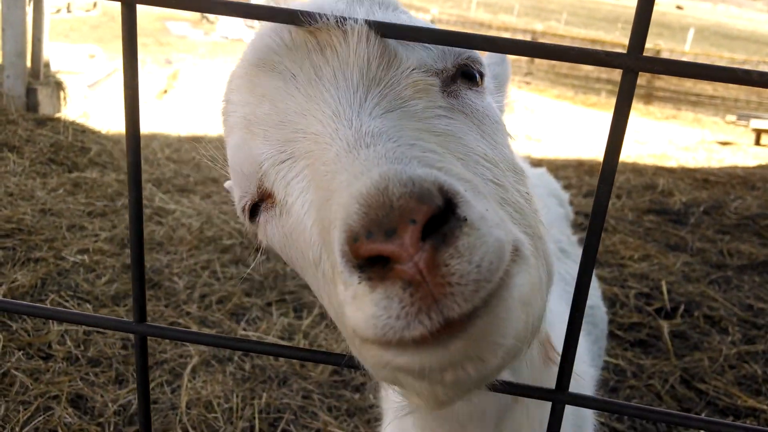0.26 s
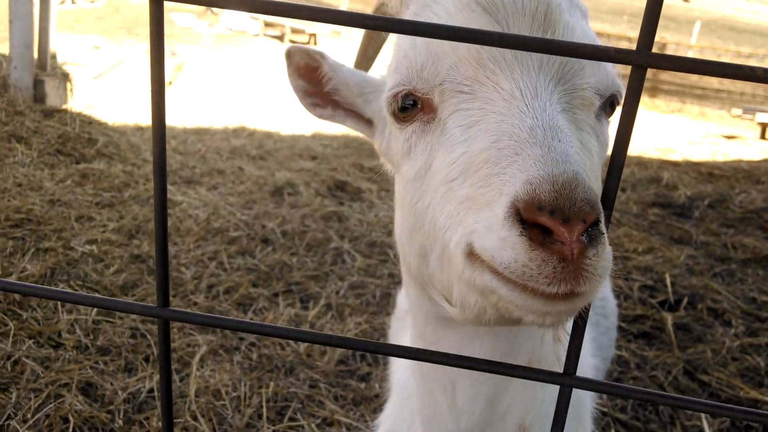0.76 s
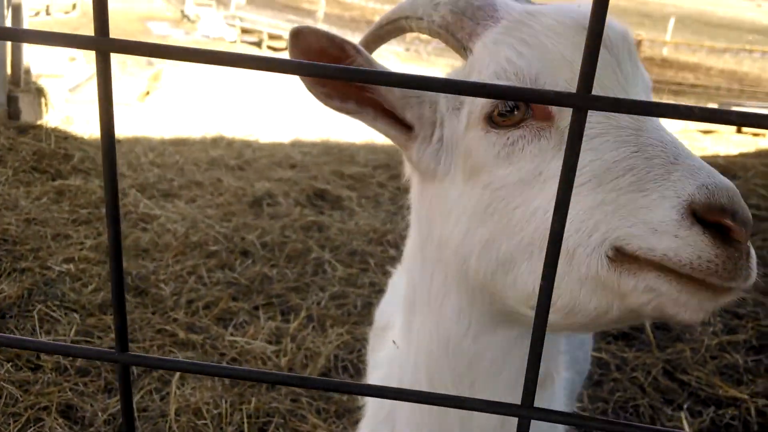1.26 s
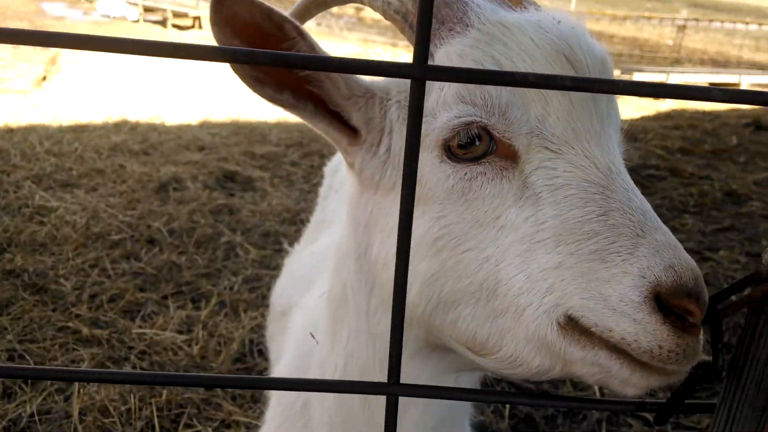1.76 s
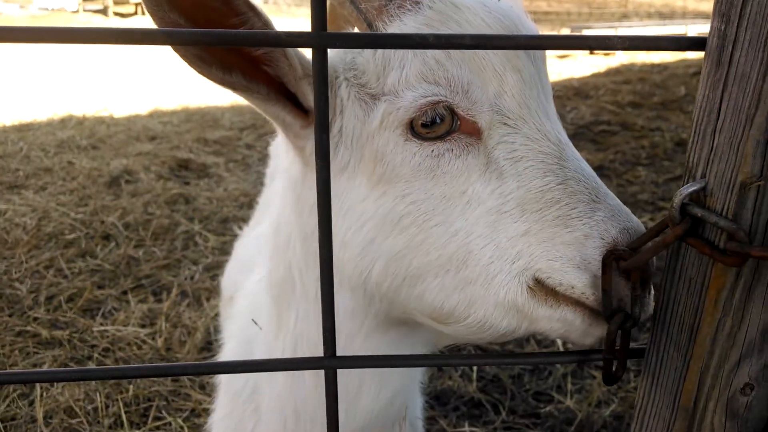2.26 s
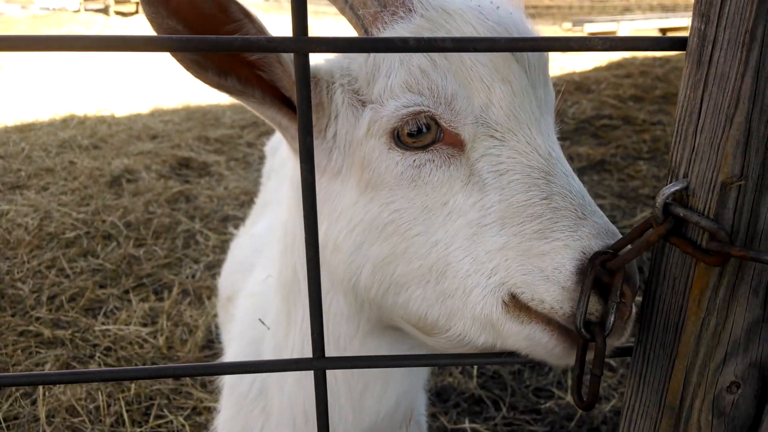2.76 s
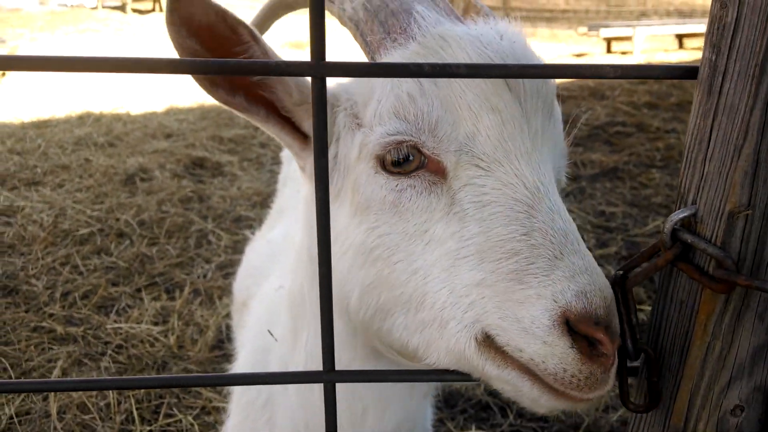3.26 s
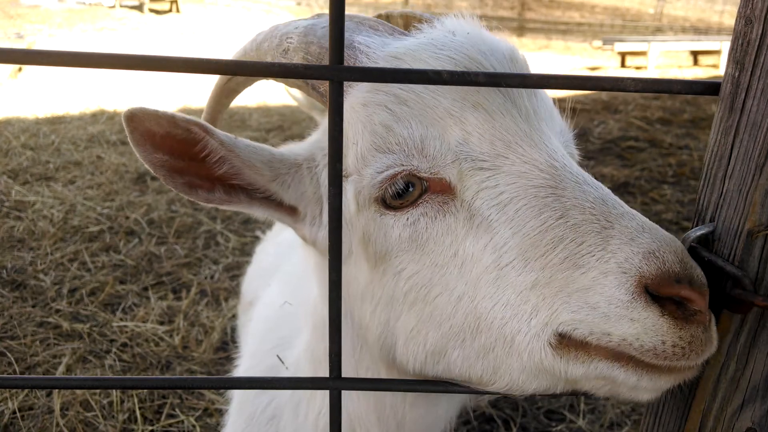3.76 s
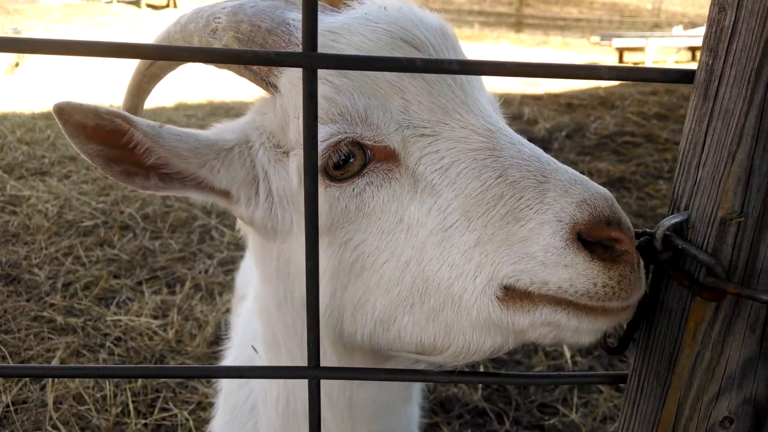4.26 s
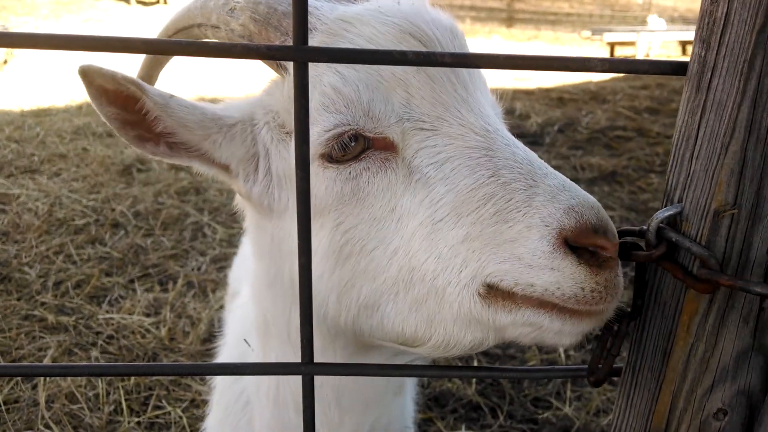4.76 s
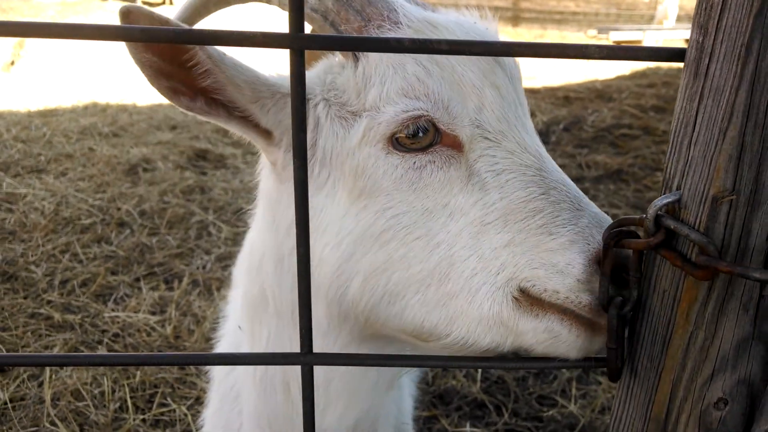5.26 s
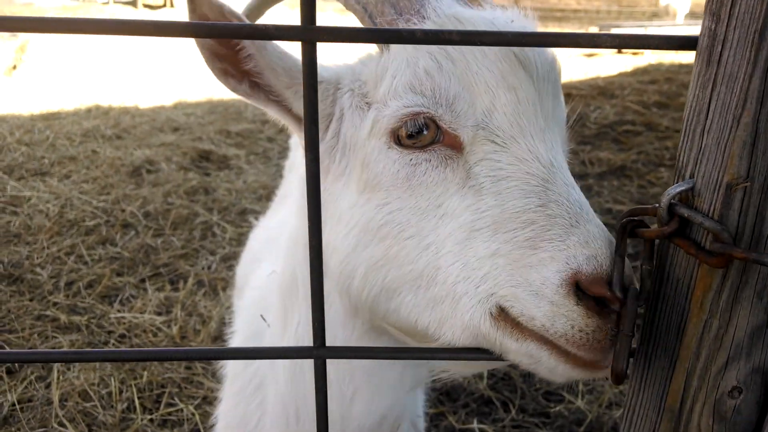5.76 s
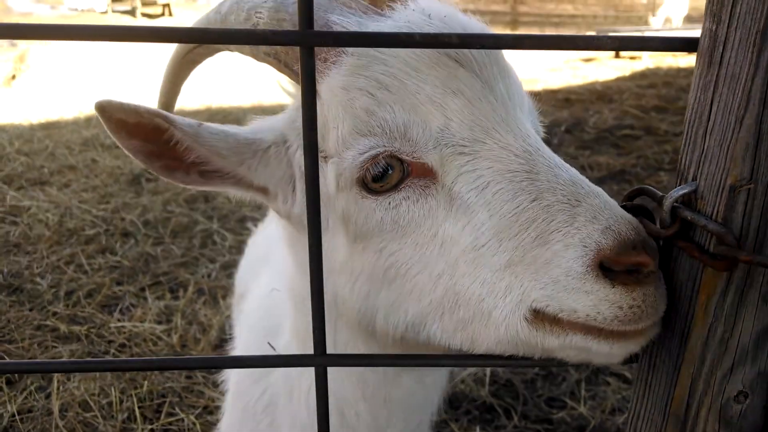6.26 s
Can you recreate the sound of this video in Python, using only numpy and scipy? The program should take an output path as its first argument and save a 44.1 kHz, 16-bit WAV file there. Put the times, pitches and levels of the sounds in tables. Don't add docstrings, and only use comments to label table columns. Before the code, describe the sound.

Close by a fence, a muzzle sniffs and scrapes at a rattling chain on hollow wood, with one quavering bleat under buffeting wind.

```python
import sys
import numpy as np
from scipy import signal
from scipy.fft import rfft, irfft
from scipy.io import wavfile
from scipy.ndimage import uniform_filter1d

SR = 44100
rng = np.random.default_rng(int(sys.argv[2]) if len(sys.argv) > 2 else 0)


def wrap_up_sound(samples):
    columns = np.atleast_2d(samples).T
    tamed = np.clip(columns, -1, 1)
    steps = np.round(tamed * 32767).astype(np.int16)
    wavfile.write(sys.argv[1], SR, steps)


def makeup_ratio(level_db):
    decades = np.asarray(level_db, float) / 20
    return 10 ** decades


N = 286650

# pitch in Hz, level in dB per Hz.
PADDOCK_SPECTRUM = [(60, 2), (200, 1.5), (500, -1.5), (1000, -18), (2000, -19.5), (4000, -24), (8000, -25),
                    (16000, -20)]
# time in seconds, level in dB.
BIRD_CHIPS = [(1.649, -26), (1.805, -25), (1.87, -30)]

# pitch in Hz, level in dB per Hz.
WIND_SPECTRUM = [(12, 2.5), (20, -5), (59, 1.5), (143, -6), (401, -23), (536, -40), (619, -41.5),
                 (742, -48), (812, -50), (1500, -51), (1950, -104), (3300, -120)]
# time in seconds, level in dB.
BREEZE_LEVEL = [(0, -39), (1.1, -35.5), (1.25, -51.5), (1.4, -38), (2.3, -46.5), (2.5, -43.5), (2.9, -38),
                (4.6, -50), (4.9, -68), (5.2, -65), (5.4, -53), (6.0, -53.5), (6.5, -57)]
# start in seconds, hold in seconds, rumble in dB, flutter in dB above the rumble.
GUST_TABLE = [(0.0, 0.021, -37, -10.5), (0.091, 0.018, -25.5, -7.5), (0.325, 0.005, -31.5, -20.5),
              (0.447, 0.071, -28.5, -9.5), (0.678, 0.13, -32, -18), (0.816, 0.022, -22.5, -3),
              (0.97, 0.038, -26.5, -7), (1.108, 0.038, -33.5, -8), (1.318, 0.0049, -33.5, -23),
              (1.468, 0.031, -27.5, -12.5), (1.612, 0.0113, -21, -6.5), (1.724, 0.061, -33.5, -6),
              (1.885, 0.031, -30, -7), (2.007, 0.015, -32, -6.5), (2.166, 0.026, -26, -18),
              (2.233, 0.012, -22, 1), (2.491, 0.0048, -25, -3.5), (2.66, 0.012, -34, -9),
              (2.795, 0.055, -32, -14.5), (2.998, 0.014, -34.5, -6), (3.101, 0.13, -33, -11.5),
              (3.327, 0.24, -39.5, -2), (3.713, 0.01, -38.5, -7), (3.857, 0.19, -43.5, -6),
              (4.215, 0.029, -36, -16), (4.439, 0.012, -35, -9), (4.545, 0.034, -36.5, -8.5),
              (5.268, 0.082, -47.5, -5.5), (6.013, 0.18, -45.5, 1.5), (6.3, 0.048, -37.5, -13)]
# time in seconds, peak in dB.
WIND_POPS = [(0.069, -26), (0.316, -25), (0.625, -29), (0.752, -24), (0.831, -18), (0.926, -30),
             (0.979, -18.5), (1.102, -24), (1.147, -28.5), (1.587, -26), (2.207, -24), (2.359, -37.5),
             (2.451, -32.5), (2.672, -34.5)]

# pitch in Hz, level in dB per Hz.
RUB_SPECTRUM = [(300, 12), (700, 8.5), (1500, 0), (2300, -1), (3500, -7.5), (5000, -27), (7000, -36),
                (10000, -65.5)]
# start in seconds, hold in seconds, level in dB.
RUB_BOUTS = [(0.1, 0.044, -50.5), (0.6, 0.17, -56), (2.3, 0.74, -56.5), (2.62, 0.3, -53.5),
             (3.0, 0.1, -49.5), (3.4, 0.064, -43.5), (3.8, 0.074, -49), (4.2, 0.035, -46.5),
             (4.5, 0.14, -45.5), (5.5, 0.37, -62), (6.05, 0.1, -50.5), (6.435, .08, -46)]
# pitch in Hz, level in dB per Hz.
SNIFF_SPECTRUM = [(1500, -72.5), (3000, 7.5), (5300, 6), (7000, 8), (9500, 8), (12000, 7), (14500, 6.5),
                  (16500, -23)]
# start in seconds, hold in seconds, level in dB.
SNIFF_BREATHS = [(0.0, .85, -63.5), (2.9, .4, -55), (3.75, .12, -53), (4.24, .26, -51), (5.7, .7, -61),
                 (6.47, .05, -51)]
# time in seconds, pitch in Hz, level in dB.
NOSTRIL_WHISTLES = [
    [(2.8, 8540, -94.5), (2.92, 11850, -56), (3.03, 13900, -53), (3.1, 13770, -50), (3.17, 14630, -48),
     (3.25, 13470, -51), (3.35, 9900, -56), (3.39, 8400, -103)],
    [(3.7, 5900, -100), (3.745, 5760, -53), (3.78, 5630, -62), (3.8, 5700, -54), (3.83, 5800, -100)],
    [(5.08, 6300, -100), (5.105, 6340, -68), (5.125, 6360, -66), (5.15, 6300, -100)],
    [(1.19, 1600, -100), (1.21, 1630, -61), (1.232, 1770, -60.5), (1.255, 1790, -100)],
]

# time in seconds, peak of the crack in dB, thud in dB,
# pitch of the thud in Hz, metal edge in dB.
HARD_KNOCKS = [(0.1485, -30.5, -32, 1610, -59), (1.708, -40, -34, 1600, -55), (1.805, -30, -36, 1200, -49),
               (1.976, -19, -26, 860, -56.5), (3.4423, -42, -34, 2310, -53.5),
               (3.4650, -32, -34, 1300, -52), (3.488, -24, -31, 1015, -56.5),
               (3.8448, -33, -34.5, 1020, -54.5), (3.8845, -26, -29.5, 990, -44.5),
               (3.91, -42, -33.5, 765, -47.5), (3.943, -18.5, -32.5, 800, -60),
               (4.0518, -40, -35.5, 819, -67), (4.203, -23.5, -30, 1210, -58.5),
               (4.223, -33, -31.5, 1164, -44), (4.6307, -9, -30, 1650, -52), (4.781, -34.5, -34, 1370, -41),
               (4.8148, -9.5, -29, 1060, -45.5), (5.265, -30, -43.5, 1700, -62),
               (5.981, -31.5, -38, 1630, -57), (6.0277, -30, -32, 1050, -38),
               (6.0382, -26, -37, 1400, -40.5), (6.168, -10, -33.5, 1167, -11.5),
               (6.1944, -31, -42.5, 1505, -28), (6.3341, -28.5, -27, 1100, -58.5),
               (6.4053, -17.5, -45, 860, -17), (6.4547, -40, -31.5, 1225, -53)]
# time in seconds, thud in dB, pitch of the thud in Hz.
SOFT_TAPS = [(2.4046, -44, 940), (2.63, -47, 1190), (2.719, -47, 795), (3.3445, -43, 1240),
             (3.3660, -34.5, 994), (3.683, -40, 1220), (3.7905, -36.5, 842), (3.812, -29.5, 1260),
             (3.8636, -32.5, 1540), (4.1342, -39, 1570), (4.4681, -43, 1140), (4.5276, -34.5, 1310),
             (4.6, -33.5, 1470), (4.9306, -43, 821), (4.958, -49, 1630), (4.967, -48, 1610),
             (5.066, -54, 1590), (5.1917, -49.5, 1670), (5.217, -50, 1680), (5.497, -49, 996),
             (5.9979, -38, 1670)]
# pitch in Hz, level in dB, seconds to die away by 60 dB.
LINK_TONES = [
    [(11290, -6, .08), (11385, -15, .14), (11418, -4, .17)],
    [(12125, -12, .14), (12160, -4, .38)],
    [(13160, -4, .08), (13190, 3, .25)],
]
# time in seconds, then first, second and third link in dB.
LINK_BLOWS = [(1.6352, -43, -48, -66), (1.708, -41, -45, -50), (1.75, -46, -55, -65),
              (1.805, -51, -50, -70), (1.9733, -26.5, -36, -50), (2.06, -70, -41, -56),
              (2.14, -70, -42, -80), (3.3144, -46, -65.5, -72), (3.3737, -49.5, -75, -70),
              (3.4682, -20, -59, -40), (3.7993, -43, -61, -68), (3.845, -42, -66, -72),
              (3.886, -39, -63.5, -72), (3.91, -47, -64, -72), (4.6326, -15.5, -32, -40),
              (4.817, -27.5, -44, -46), (5.217, -47, -64, -74.5), (5.9805, -44, -44, -62),
              (6.0404, -23, -39, -48), (6.195, -36, -52, -68), (6.3604, -38, -66, -70),
              (6.407, -38, -56.5, -60), (6.4551, -31, -51.5, -64)]
# pitch in Hz, level in dB, seconds to die away by 60 dB.
WIRE_TONES = [
    [(2964, -3, 0.023), (3250, -4.5, 0.033), (3270, -30, 0.48)],
    [(4204, -3, 0.019), (4480, -4.5, 0.014), (4800, -19, 0.014)],
]
# time in seconds, low note in dB, high note in dB.
WIRE_TICKS = [(3.343, -35, -37), (3.366, -33, -32), (3.375, -31, -30), (3.389, -38, -37), (3.443, -27, -45),
              (3.452, -42, -43), (3.471, -19.5, -18), (3.488, -21, -16.5), (3.523, -33, -40),
              (3.557, -44, -44), (3.682, -50, -38), (3.792, -38, -40), (3.815, -36, -33), (3.845, -31, -25),
              (3.858, -31, -27), (3.886, -30, -21), (3.892, -24, -18), (3.944, -26, -12),
              (4.052, -42, -32.5), (4.133, -46, -48), (4.205, -38, -19), (4.213, -42, -23),
              (4.287, -48, -40), (4.528, -24, -34), (4.583, -44, -38), (4.601, -34, -44), (4.631, -30, -28),
              (4.8146, -22, -18.5), (4.930, -48, -47), (5.191, -52, -53), (5.217, -46, -54),
              (5.981, -31, -30), (6.000, -34, -42), (6.028, -42, -32), (6.040, -41, -24), (6.168, -40, -30),
              (6.335, -21, -22.5), (6.405, -25.5, -21.5), (6.453, -33, -31.5)]
# pitch in Hz, level in dB, seconds to die away by 60 dB.
POST_TONES = [
    [(1623, -8, 0.039), (1810, -3, 0.034), (1935, -7, 0.03), (1100, -12, 0.04)],
]
# time in seconds, level in dB.
POST_BLOWS = [(0.149, -46), (3.443, -30), (4.052, -37), (4.43, -40), (4.47, -46), (4.530, -39),
              (4.602, -46), (4.632, -36.5), (4.783, -33.5), (4.8147, -23.5), (4.931, -48), (4.960, -43),
              (5.066, -44), (5.192, -52), (5.218, -50), (5.266, -44), (6.030, -33), (6.167, -33),
              (6.335, -22.5)]

# start in seconds, length in seconds, peak in dB,
# highest pitch of the second partial in Hz, upper partials in dB against it.
BLEAT_THROBS = [
    (1.308, 0.058, -34.5, 891, -9.5),
    (1.4, 0.075, -23.5, 901.6, -14),
    (1.502, 0.075, -22, 927, -14.5),
    (1.603, 0.079, -24, 929.5, -14),
    (1.7, 0.084, -23, 928.5, -13.5),
    (1.804, 0.081, -23.5, 928, -14),
    (1.909, .082, -23, 925, -14.5),
    (2.008, 0.082, -21.5, 933.5, -15.5),
    (2.109, 0.083, -21.5, 923, -14.5),
    (2.212, 0.067, -31, 746, -17.5),
]
# pitch in Hz, level in dB.
THROAT_COLOUR = [(1200, -33), (1800, -16), (2050, -20), (2280, -1), (2520, -8), (2780, -2), (3250, 0),
                 (3650, 2), (4050, -13), (4600, -10), (5200, -16), (6600, -11), (7400, -14), (7900, -21),
                 (10300, -21), (11300, -38), (14000, -44)]
# seconds after the start, Hz under the top.
PITCH_CLIMB = [(.006, 220), (.018, 135), (.029, 50), (.042, 8)]
# seconds before the end, Hz under the top.
PITCH_DROP = [(.008, 180), (.02, 53.5), (.03, 0)]

# pitch in Hz, level in dB.
BODY_SHADE = [(500, 0.5), (900, -1), (1400, 2), (2500, -0.5), (4000, -3.5), (6500, 3.5), (9000, -5),
              (14000, 1)]
# pitch in Hz, level in dB.
CROSS_SHARE = [(100, -3), (1000, -4), (2670, -6), (4000, -14.5), (5350, -9.5), (7000, -7), (10000, -16),
               (16000, -7)]


def rms_one(x):
    return x / np.sqrt(np.mean(x ** 2) + 1e-20)


def noise():
    return rng.standard_normal(N)


def in_time(rows):
    s, *columns = np.transpose(rows)
    return [np.interp(np.arange(N) / SR, s, column) for column in columns]


def drift(rate_hz):
    r = np.exp(-2 * np.pi * rate_hz / SR)
    wander = signal.lfilter([1], [1, -2 * r, r * r], rng.standard_normal(N + SR))
    return rms_one(wander[SR:])


def coloured(x, spectrum):
    hz, db = np.transpose(spectrum)
    grid = np.log(np.fft.rfftfreq(N, 1 / SR) + 1)
    gain = makeup_ratio(np.interp(grid, np.log(hz), db))
    return rms_one(irfft(rfft(x) * gain, N))


def band(x, low_hz, high_hz):
    return signal.sosfilt(signal.butter(2, [low_hz, high_hz], "band", fs=SR, output="sos"), x)


def ring(clicks, hz, t60):
    r, w = makeup_ratio(-60 / (t60 * SR)), 2 * np.pi * hz / SR
    return signal.lfilter([0, np.sin(w)], [1, -2 * r * np.cos(w), r * r], clicks + 1e-18)


def struck(bodies, rows):
    out, at = np.zeros(N), [round(row[0] * SR) for row in rows]
    for body, tones in enumerate(bodies):
        blow_db = np.array(rows)[:, body + 1]
        for hz, tone_db, t60 in tones:
            clicks = np.zeros(N)
            clicks[at] = makeup_ratio(blow_db + tone_db + rng.normal(0, 2, len(at)))
            out += ring(clicks, hz, t60)
    return out


def late(x, delay_s, spectrum=((1, 0), (2, 0))):
    hz, db = np.transpose(spectrum)
    grid = np.fft.rfftfreq(N, 1 / SR)
    gain = makeup_ratio(np.interp(np.log(grid + 1), np.log(hz), db))
    return irfft(rfft(x) * gain * np.exp(-2j * np.pi * grid * delay_s), N)


def from_right(x, lag_s, shade_db, bounce_db):
    left = late(x, lag_s, BODY_SHADE)
    scatter = rng.standard_normal(900) * np.exp(-np.arange(900) / SR / 0.0061)
    scatter = scatter / np.linalg.norm(scatter)
    bounces = np.roll(left, round(0.001625 * SR))
    bounces = bounces + 2.5 * signal.oaconvolve(band(left, 780, 14300), scatter)[:N]
    return np.array([makeup_ratio(shade_db) * (left + makeup_ratio(bounce_db) * bounces), x])


def bouts(rows, rise_db_per_s, fall_db_per_s):
    t = np.arange(0, N, 32) / SR
    s, hold, db = np.array(rows).T[:3, :, None]
    rise = rise_db_per_s * np.maximum(s - t, 0)
    fall = fall_db_per_s * np.maximum(t - s - hold, 0)
    return db - rise - fall


def loudest(levels_db, rest_db):
    return np.maximum(np.repeat(levels_db.max(axis=0), 32)[:N], rest_db)


def paddock():
    return np.array([makeup_ratio(-53.5) * coloured(noise(), PADDOCK_SPECTRUM) for port in range(2)])


def bird():
    t, out = np.arange(N) / SR, np.zeros(N)
    for s, db in BIRD_CHIPS:
        puff = np.exp(-((t - s) / 0.0015) ** 2)
        out += makeup_ratio(db) * puff * np.sin(2 * np.pi * 4300 * t + 0.98 * drift(150))
    return out


def gusts():
    breeze_db, = in_time(BREEZE_LEVEL)
    levels_db = bouts(GUST_TABLE, rise_db_per_s=309, fall_db_per_s=303)
    flutter_db = loudest(levels_db + np.array(GUST_TABLE)[:, 3:], breeze_db - 11)
    rumble_db = loudest(levels_db, breeze_db)
    return uniform_filter1d(rumble_db, size=200), uniform_filter1d(flutter_db - rumble_db, size=200)


def wind():
    rumble_db, flutter_db = gusts()
    ports = []
    for share_db in (0, -13):
        eddies = coloured(noise() * makeup_ratio(2.1 * drift(28)), WIND_SPECTRUM)
        rumble = rms_one(band(eddies, 15, 259))
        flutter = rms_one(band(eddies, 184, 1020)) * makeup_ratio(flutter_db - 6.5)
        ports.append(makeup_ratio(rumble_db + 16.5 + share_db) * (rumble + flutter))
    swing = np.arange(-300, 300) / SR / 0.0011
    pop = swing * np.exp(-swing ** 2 / 2)
    for s, db in WIND_POPS:
        start = round((s + 0.00327) * SR) - 300
        ports[0][start:start + len(pop)] += makeup_ratio(db + 22) * pop
    return np.array(ports)


def rubbing():
    level_db = loudest(bouts(RUB_BOUTS, rise_db_per_s=56, fall_db_per_s=39), rest_db=-67.5)
    level_db = level_db + 3.5 + 3.24 * drift(18)
    big_grains = rng.random(N) < 900 / SR
    sizes = makeup_ratio(1.0) + makeup_ratio(4.23 * rng.exponential(1, N)) * big_grains
    shared, left, right = (coloured(noise() * sizes, RUB_SPECTRUM) for draw in range(3))
    shared = rms_one(shared + 0.61 * band(shared, 960, 1250) + 0.96 * band(shared, 1550, 1840))
    return makeup_ratio(level_db) * (from_right(shared, 0.00022, -2.3, -43) + makeup_ratio(-4.5) * np.array([left, right]))


def sniffing():
    level_db = loudest(bouts(SNIFF_BREATHS, rise_db_per_s=68, fall_db_per_s=38), rest_db=-70)
    ports = [makeup_ratio(level_db + 2.5 + 2 * drift(12)) * coloured(noise(), SNIFF_SPECTRUM) for port in range(2)]
    return np.array(ports)


def whistling():
    out = np.zeros(N)
    for hz, db in map(in_time, NOSTRIL_WHISTLES):
        phase = 2 * np.pi * np.cumsum(hz * (1 + 0.012 * drift(80))) / SR
        out += makeup_ratio(db - 4 + 4.5 * drift(30)) * np.sin(phase)
    return from_right(out, 0.000207, -0.35, 2.7)


def knock(crack_db, thud_db, thud_hz, edge_db):
    t = np.arange(SR // 8) / SR
    metal, wood = rng.standard_normal((2, len(t)))
    crack_hz = 4020 * (1 + 0.067 * rng.standard_normal())
    snap = metal * (np.exp(-t / 0.00085) + 0.21 * np.exp(-t / 0.005))
    crack = band(snap, 0.845 * crack_hz, 0.849 * crack_hz) + 2.04 * band(snap, 2180, 7060)
    edge = band(band(metal * np.exp(-t / 0.003), 10300, 13000), 10300, 13000)
    crack += makeup_ratio(edge_db - crack_db + 13) * edge
    crack += 1.14 * band(snap, 5720, 7100)
    rattle = wood * (np.exp(-t / 0.018) + 0.27 * np.exp(-t / 0.036))
    thud = band(rattle, 0.34 * thud_hz, 2.17 * thud_hz)
    thud += 1.5 * band(thud, 0.945 * thud_hz, 1.036 * thud_hz)
    crack = makeup_ratio(crack_db + 7.5) * crack / np.abs(crack).max()
    return crack + makeup_ratio(thud_db + 9.5) * thud / np.abs(thud).max()


def chain():
    out = np.zeros(N + SR)
    taps = [(s, db - 5.5, db, hz, db - 39) for s, db, hz in SOFT_TAPS]
    for s, *strengths in HARD_KNOCKS + taps:
        hit = knock(*strengths)
        out[round(s * SR):][:len(hit)] += hit
    wire = band(struck(WIRE_TONES, WIRE_TICKS), 2600, 4650)
    return out[:N] + struck(LINK_TONES, LINK_BLOWS) + wire


def hollow_post():
    return struck(POST_TONES, POST_BLOWS)


def throb_shape(start, length, peak_db, top_hz, upper_db):
    s = start + np.array([0, 0.017, 0.35 * length, length - 0.019, length])
    below_db = np.array([-13, 1.5, 0, 0, -18])
    return s, top_hz, peak_db + below_db, upper_db - 0.57 * below_db


def throat(closure, phase, puffs, odd_db, breath):
    k = np.arange(3, 19)[:, None]
    shimmer = rng.standard_normal((len(k), len(phase)))
    shimmer_db = uniform_filter1d(shimmer, size=300) * 21 * np.sqrt(k)
    partial_db = odd_db * (k % 2) + shimmer_db - 0.45 * np.maximum(k - 9, 0)
    partials = np.sum(makeup_ratio(partial_db) * np.cos(k * phase + 0.15 * k ** 2), axis=0) / 3
    source = closure * partials + (breath + 0.45 * (1 - closure)) * puffs
    throat_db = np.interp(np.fft.rfftfreq(len(phase), 1 / SR), *np.transpose(THROAT_COLOUR))
    return rms_one(irfft(rfft(source) * makeup_ratio(throat_db), len(phase)))


def throb(t, s, top_hz, db, upper_db, odd_db):
    slack = top_hz < 800
    edge = np.clip(np.minimum(t - t[0], t[-1] - t) / 0.013, 0, 1) ** 2
    climb = np.interp(t - s[0], *np.transpose(PITCH_CLIMB))
    drop = np.interp(s[-1] - t, *np.transpose(PITCH_DROP))
    arch = top_hz - (climb + drop) * (0.45 if slack else 1)
    wobble = signal.lfilter([0.03], [1, -0.97], rng.standard_normal(len(t)))
    phase = np.pi * np.cumsum(uniform_filter1d(arch, size=300) * (1 + 0.045 * wobble)) / SR
    level_db = uniform_filter1d(np.interp(t, s, db), size=200)
    voiced = np.clip(np.minimum((t - s[0] - 0.0098) / 0.018, (s[-1] - 0.0082 - t) / 0.013), 0.06, 1)
    closure = np.clip(1 + (level_db - level_db.max()) / 11, 0, 1)
    closure = closure * np.clip(np.minimum(s[-2] + 0.003 - t, t - s[1] + 0.004) / 0.01, 0.15, 1)
    puffs = rng.standard_normal(len(t)) * (1 + 0.8 * np.cos(phase))
    mouth = throat(closure, phase, puffs, odd_db, breath=0.3)
    clear = makeup_ratio(4) * np.sin(2 * phase) * voiced + makeup_ratio(-18.5) * rms_one(band(puffs, 370, 2670))
    undertone_db = -45 + 16.5 * slack - level_db.max()
    clear += makeup_ratio(undertone_db) * (np.sin(phase) + 0.17 * np.sin(3 * phase)) * voiced
    return edge * makeup_ratio(level_db) * (clear + makeup_ratio(np.interp(t, s, upper_db) + 8) * mouth)


def bleat():
    out = np.zeros(N)
    for row in BLEAT_THROBS:
        s, top_hz, db, upper_db = throb_shape(*row)
        odd_db = -2.5 - 3 * (s[0] - BLEAT_THROBS[0][0])
        at = np.arange(round((s[0] - 0.012) * SR), round((s[-1] + 0.011) * SR))
        out[at] += throb(at / SR, s, top_hz, db, upper_db, odd_db)
    echo = np.roll(band(out, 380, 7200), round(0.026 * SR))
    echo = echo + 0.69 * np.roll(band(out, 730, 2110), round(0.049 * SR))
    bright_echo = np.roll(band(out, 1200, 4600), round(0.037 * SR))
    shed = ring(band(out, 1900, 2180), 2200, 0.16)
    return out + makeup_ratio(-19.5) * echo + makeup_ratio(-22) * bright_echo + makeup_ratio(-48) * shed


def scene():
    near = from_right(bleat(), 0.00022, -11, -1.6)
    near += from_right(chain(), 0.00021, -12, -9.5)
    near += from_right(hollow_post(), 0.0001, -2, -11.5)
    muzzle = rubbing() + sniffing() + whistling()
    return paddock() + bird() + wind() + muzzle + near


def top_cut(x):
    return signal.sosfilt(signal.butter(12, 16790, fs=SR, output="sos"), x)


def record(dry):
    dull_left = late(dry[0], 0, [(5000, 1.5), (8000, -2), (12000, -8.5), (16000, -18)])
    ports = np.array([dull_left, dry[1]])
    out = ports - late(ports[::-1], 0.000374, CROSS_SHARE)
    out = 0.95 * np.tanh(out / 0.95)
    out = signal.sosfilt(signal.cheby2(10, 30, 16500, fs=SR, output="sos"), out)
    return top_cut(out)


dry = scene()
out = record(dry)
wrap_up_sound(out)
```